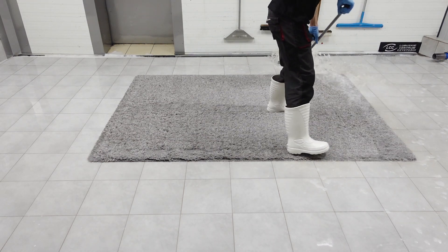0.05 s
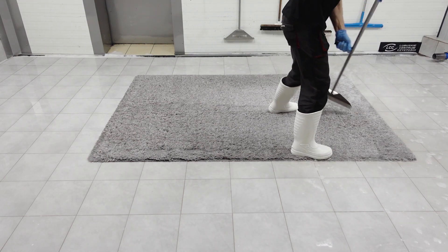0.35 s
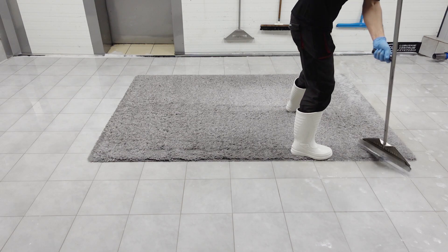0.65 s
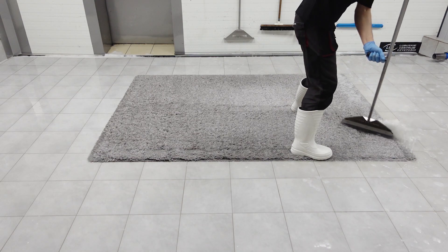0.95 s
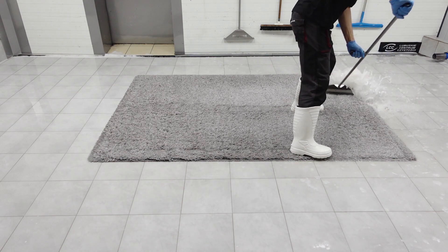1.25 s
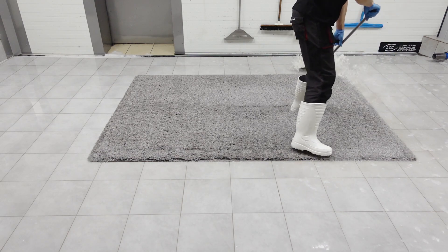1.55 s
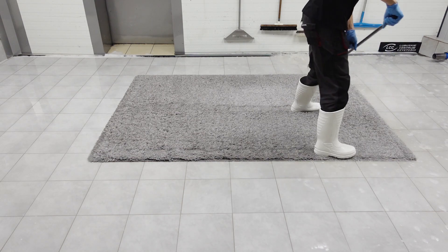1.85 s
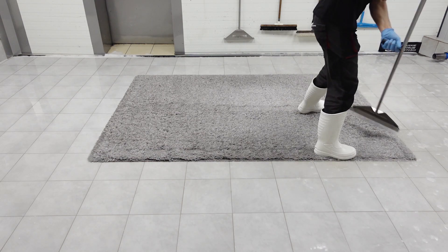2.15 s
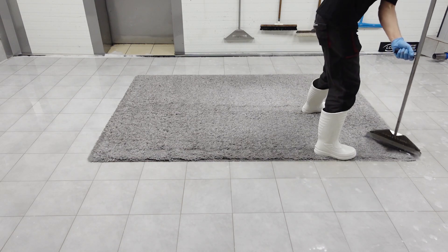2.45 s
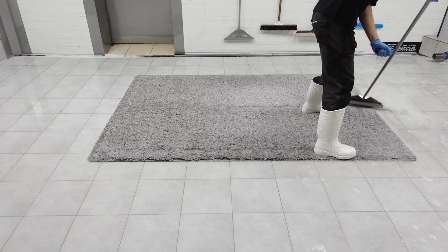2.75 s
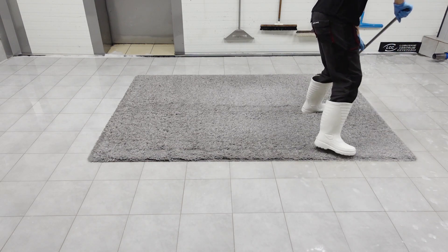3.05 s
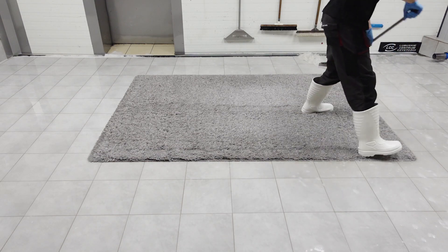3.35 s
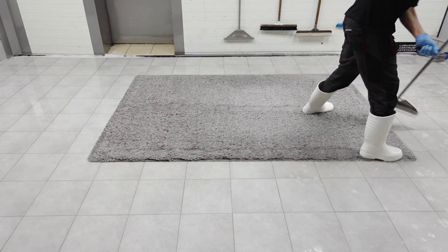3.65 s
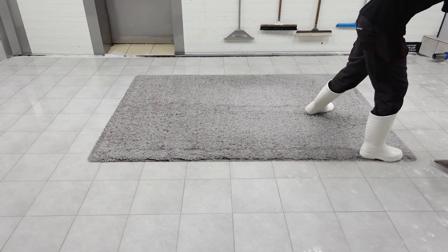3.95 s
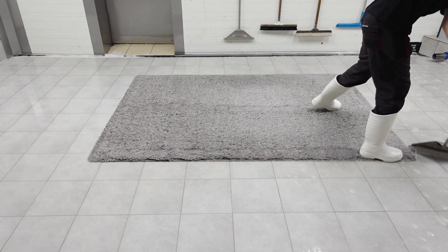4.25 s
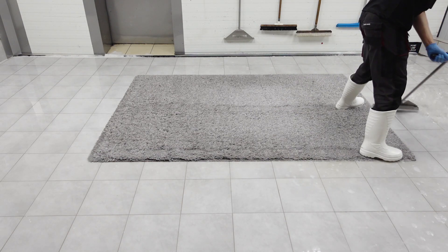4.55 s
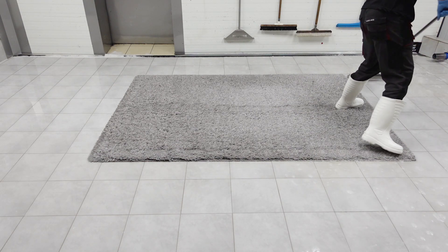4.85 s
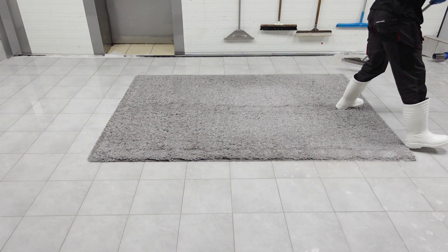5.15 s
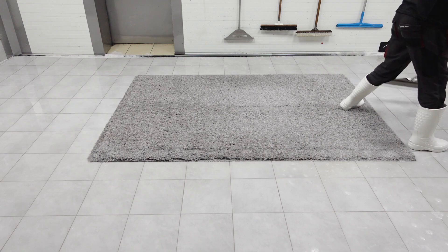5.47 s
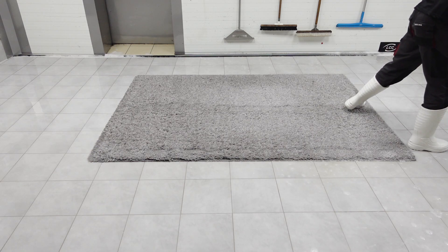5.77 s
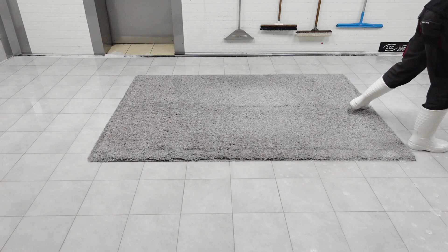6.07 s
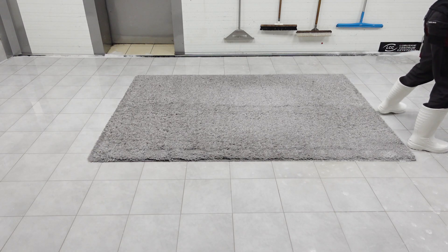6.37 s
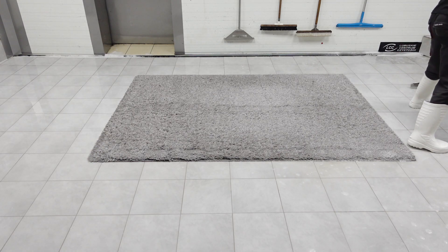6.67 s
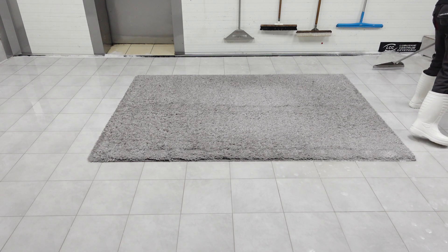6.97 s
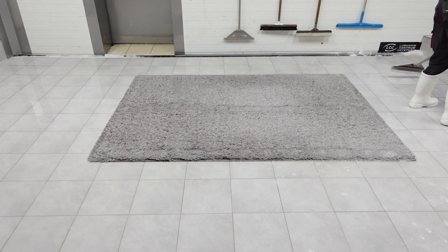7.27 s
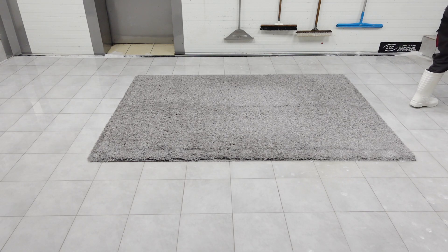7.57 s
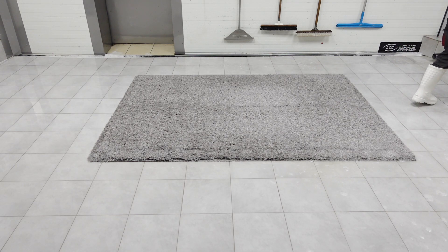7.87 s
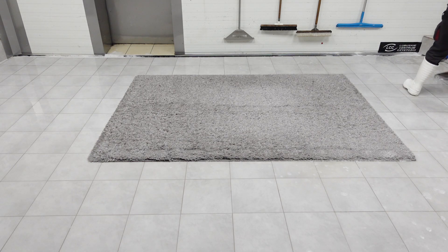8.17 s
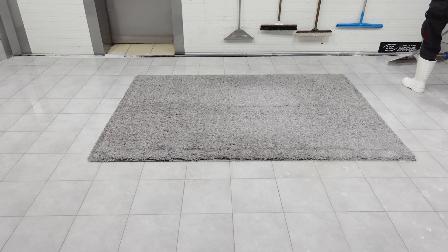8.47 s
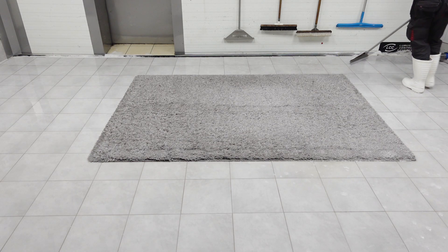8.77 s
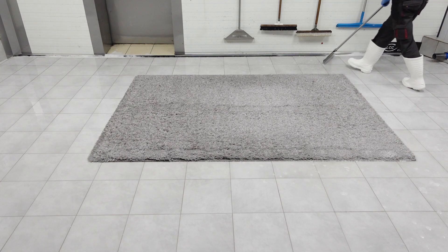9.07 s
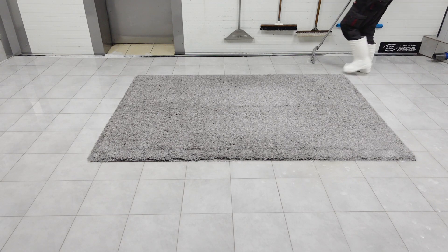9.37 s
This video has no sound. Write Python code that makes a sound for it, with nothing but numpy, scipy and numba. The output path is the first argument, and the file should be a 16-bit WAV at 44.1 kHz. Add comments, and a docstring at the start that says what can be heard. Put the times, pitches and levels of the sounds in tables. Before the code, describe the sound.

Water gushes and sprays onto tiles as a squeegee sweeps a wet carpet again and again, its frame knocking once.

```python
"""A bubbling gush and a hiss of spray: a floor squeegee, a few metres away, pushes water off a soaked
carpet onto the tiles of a hard-walled washing room. Each stroke drives a wave of ringing bubbles and
throws drops; in the later pushes a hollow under the wave rings with a gliding pitch. The wet pile
squelches under blade and rubber boots, and a low groan swells twice. The blade slaps down between
strokes, and its frame knocks once and rebounds. A faint ventilation hum lies under it all."""
import sys
import numpy as np
from scipy import signal
from scipy.fft import rfft, irfft
from scipy.io import wavfile
from numba import njit

SR = 44100
rng = np.random.default_rng(int(sys.argv[2]) if len(sys.argv) > 2 else 0)


def transcribe(u):
    """Save the signal u as a 16-bit wav file named by the first command-line argument.

    u: samples, shape (n,) or (channels, n), limited to [-1, 1]; the rate is SR.
    q: integer samples, one column per channel.
    """
    v = np.clip(np.atleast_2d(u).T, -1, 1)
    q = np.round(v * 32767).astype(np.int16)
    wavfile.write(sys.argv[1], SR, q)


N = 415412
TIME = np.arange(N) / SR
LIFT_DB_PER_S = 74  # release of spray and hollow once the blade lifts

# Pushes of the blade: start t/s, attack/s, lift t/s, spray end t/s, wave release/(dB/s), wave level/dB,
# spray level/dB, swell/(dB/s), deepest t/s, gulp level there against the wave/dB
STROKES = [(-0.25, .25, 0.27, 0.24, 82, -30.5, -32, 7, 0.16, -15.5),
           (0.75, 0.57, 1.8, 1.83, 74, -37, -34, 13.5, 1.83, -8),
           (2.48, 0.36, 3.47, 3.23, 78, -41.5, -38.5, -6.5, 2.95, -5.5),
           (4.13, 0.55, 5.02, 4.94, 190, -23, -28.5, 1, 4.3, -15.5),
           (6.019, 0.34, 6.98, 6.82, 78, -23, -33.5, 5.5, 6.6, -13.5),
           (6.84, 0.094, 6.994, 7.02, 70, -26, -33.5, 3, 6.9, -20),
           (7.88, 0.27, 8.9, 8.55, 80, -30, -35.5, -5.5, 8.38, -10.5),
           (8.56, 0.24, 9.27, 9.5, 78, -30.5, -44.5, -3.5, 9.15, -10)]
def strokes(deep_s=0.13, thin_gulp_db=-2):
    """Each push piles water deep, then thins. Returns wave power, spray power and the gulps' dB offset."""
    wave_power, spray_power, gulping = 0, 0, 0
    for start, attack_s, lift, spray_end, release, wave_db, spray_db, swell, deepest, gulp_db in STROKES:
        full = start + attack_s
        effort = undb(swell * (np.clip(TIME, full, lift) - (full + lift) / 2))
        wave_shape = envelope(start, attack_s, lift, release, curve=1.08)
        spray_shape = envelope(start, attack_s, spray_end, LIFT_DB_PER_S, curve=1.19)
        push = (effort * undb(wave_db) * wave_shape) ** 2 + 1e-18
        depth = bell_curve(deepest, deep_s)
        gulping += push * (gulp_db + thin_gulp_db * (1 - depth))
        wave_power += push
        spray_power += (effort * undb(spray_db) * spray_shape) ** 2
    return wave_power, spray_power, gulping / wave_power


# Water flung off the blade: t/s, attack/s, release after/s, wash level/dB, spray level/dB
FLINGS = [(0.17, .025, 0.081, -38.5, -32.5), (0.41, 0.027, 0.08, -42.5, -44.5),
          (0.893, .03, 0.046, -49, -48.5), (1.28, .03, 0.07, -36, -38), (1.67, 0.071, 0.2, -33.5, -39.5),
          (1.965, 0.024, 0.074, -39, -37.5), (3.287, .09, 0.12, -41.5, -34.5),
          (3.462, 0.044, 0.08, -40, -39.5), (4.222, 0.057, 0.13, -30, -44), (5.186, .006, 0.18, -42, -38),
          (7.072, 0.032, 0.054, -34, -28), (7.947, 0.082, 0.1, -30, -38.5), (8.42, 0.028, 0.044, -42, -39)]
def flings(wash_db_per_s=48, spray_db_per_s=74.5):
    """Flung water rains on the tiles; its spray dies sooner than its wash. Returns the power of both."""
    wash_power, spray_power = 0, 0
    for start, attack_s, length_s, wash_db, spray_db in FLINGS:
        end = start + length_s
        wash_power += (undb(wash_db) * envelope(start, attack_s, end, wash_db_per_s)) ** 2
        spray_power += (undb(spray_db) * envelope(start, attack_s, end, spray_db_per_s)) ** 2
    return wash_power, spray_power


# Mid-forward EQ of the wave: f/Hz, level/dB
WAVE_EQ = [(100, -63), (400, -30.5), (700, -3.5), (1000, -1), (1500, 2), (2300, 0.5), (3200, -4),
           (4900, -12), (7000, -13.5), (10000, -19), (15000, -47.5)]
def wave():
    """The churning ridge of water ahead of the blade: ringing bubbles in froth."""
    cloud = bubbles(low_hz=616, high_hz=5956, cycles=12.1, spread_db=1.4, glide=0.22, count=50000)
    froth = undb(2.5) * droplets(spread_db=2.5, count=90000)
    ridge = unit(churn(equalise(cloud + froth, WAVE_EQ)))
    return ridge * undb(1.1 * wander(22))


def churn(rest, flicker_db=1.97, per_s=17):
    """Bubbles of each size come and go in their own bursts, so each half octave flickers alone."""
    out = np.zeros(N)
    for hz in 700 * 2 ** (np.arange(6) / 2):
        band = signal.sosfiltfilt(signal.butter(4, hz, fs=SR, output="sos"), rest)
        out += band * undb(flicker_db * wander(per_s))
        rest = rest - band
    return out + rest


# Throaty EQ of the gulps: f/Hz, level/dB
GULP_EQ = [(70, -47), (220, -36), (350, -11), (480, -1), (700, 6), (950, -4), (1400, 2), (2500, -43)]
def gulps():
    """Large bubbles fold in where the water piles deep."""
    cloud = bubbles(low_hz=291, high_hz=1285, cycles=12, spread_db=1.5, glide=0.11, count=7000)
    return unit(equalise(cloud, GULP_EQ) * undb(5.9 * wander(16)))


# Resonant sweeps of the long pushes: bandwidth/pitch, breakpoints of (t/s, f/Hz, level/dB)
HOLLOWS = [(0.87, [(4.2, 900, -45), (4.3, 1640, -27), (4.48, 1650, -43), (4.7, 1390, -23.5),
           (4.82, 1590, -27), (5.0, 1730, -24.5), (5.07, 1480, -21), (5.13, 1110, -33.5)]),
           (0.69, [(6.05, 1090, -48), (6.19, 1260, -30), (6.25, 1170, -42), (6.42, 990, -26),
           (6.58, 1030, -33), (6.76, 1380, -29), (6.84, 1500, -35), (6.93, 1494, -26), (7.1, 1300, -35.5)]),
           (0.43, [(8.3, 800, -50), (8.42, 840, -36), (8.52, 940, -29), (8.62, 1200, -32),
           (8.76, 1620, -29), (8.9, 1950, -39)]), (0.68, [(8.86, 1160, -42), (9.0, 1160, -29.5),
           (9.1, 1250, -26), (9.22, 1580, -29), (9.32, 1710, -31.5), (9.41, 1750, -44)])]
def hollows(slosh_octaves=0.045, attack_s=0.012):
    """Froth rings the hollow under the bow wave; its pitch climbs as the water runs thin."""
    froth, out = droplets(spread_db=1.2, count=30000), np.zeros(N)
    for width, sweep in HOLLOWS:
        times, hz, db = np.transpose(sweep)
        pitch = np.interp(TIME, times, hz) * 2 ** (slosh_octaves * wander(12))
        voice = unit(resonance(froth, pitch, width, width) / np.sqrt(pitch))
        gate = envelope(times[0], attack_s, times[-1], LIFT_DB_PER_S)
        out += voice * undb(np.interp(TIME, times, db)) * gate
    return out


# Low gushing accents: t/s, centre f/Hz, level/dB
SURGES = [(4.52, 513, -34.5), (4.645, 487, -36), (4.77, 528, -30), (6.68, 726, -33), (6.995, 475, -37),
          (8.11, 695, -31), (8.27, 382, -39), (8.361, 477, -35), (8.63, 657, -36.5)]
def surges(width=0.46, attack_s=0.012, length_s=0.016, release_db_per_s=163):
    """A lump of water folds over ahead of the blade with a sudden low gush."""
    shower, out = droplets(spread_db=1, count=20000), np.zeros(N)
    for start, hz, db in SURGES:
        gush = unit(resonance(shower, hz, width, width))
        out += undb(db) * gush * envelope(start, attack_s, start + length_s, release_db_per_s)
    return out


# Crests breaking out of the wave: peak t/s, centre f/Hz, level/dB
CRESTS = [(0.215, 1010, -31), (1.359, 2570, -35), (1.83, 836, -30.5), (1.86, 1803, -30), (3.26, 2900, -41),
          (3.47, 1480, -34.5), (4.96, 4570, -27), (8.14, 1620, -29), (8.39, 1080, -29)]
def crests(spread_s=0.043, width=0.47):
    """A crest swells and collapses into a brief shower of bubbles of much the same size."""
    shower, out = droplets(spread_db=5, count=25000), np.zeros(N)
    for peak, hz, db in CRESTS:
        fizz = unit(resonance(shower, hz, width, 2 * width))
        out += undb(db) * fizz * bell_curve(peak, spread_s)
    return out


# Bright EQ of the spray: f/Hz, level/dB
SPRAY_EQ = [(800, -32.5), (1600, 0.5), (2600, 4), (5000, 0.5), (6500, -1), (8500, -3), (13500, -9),
            (16000, -10.5)]
def spray(wave_db, spray_db, crossover_hz=7500, fineness=0.21):
    """Spurts of mist and crackling drops; deep water throws coarser, duller drops than the bare pile."""
    mist = droplets(spread_db=2.5, count=150000)
    crackle = undb(-8.5) * droplets(spread_db=0.5, count=6000) + undb(-11) * spatter()
    drops = unit(equalise(mist + crackle, SPRAY_EQ)) * undb(1.3 * wander(30))
    coarse = signal.sosfiltfilt(signal.butter(2, crossover_hz, fs=SR, output="sos"), drops)
    fine = undb(fineness * (spray_db - wave_db)) * (drops - coarse)
    return undb(spray_db) * (coarse + fine)


def spatter(decay_s=0.00094):
    """Single fat drops burst on the tiles, each a tiny splash of noise."""
    hits = np.abs(droplets(spread_db=2, count=900))
    bursts = signal.oaconvolve(hits, np.exp(-TIME[:SR // 100] / decay_s))[:N]
    return unit(bursts * rng.standard_normal(N))


# Blade and boots meeting the wet floor: t/s, splash level/dB, knock level/dB, splash low-pass f/Hz
SLAPS = [(0.794, -29.5, -64, 3880), (2.449, -32.5, -57, 5030), (4.1125, -18.5, -51, 12020),
         (6.035, -35, -59, 14000), (7.5665, -34.5, -68, 12000), (7.7882, -37, -74, 6040)]
# Broad EQ of those hits: f/Hz, level/dB
SLAP_EQ = [(40, -38), (150, -14.5), (500, -2), (1400, -3), (2400, -3), (4000, -7.5), (8000, -11),
           (15000, -24)]
def slaps(decay_s=0.04, knock_trim_db=-3, splash_trim_db=-7):
    """The rubber lands, rings the frame of the blade and bursts the water film."""
    t, out = TIME[:SR // 3], np.zeros(N)
    landing = 1 - np.exp(-t / 0.0013)  # water cushions the first touch
    for start, splash_db, knock_db, top_hz in SLAPS:
        burst = undb(splash_db + splash_trim_db) * rng.standard_normal(len(t)) * np.exp(-t / decay_s)
        splash = signal.sosfilt(signal.butter(2, top_hz, fs=SR, output="sos"), burst)
        body = undb(knock_db + knock_trim_db) * frame_ring(t)
        add(out, start, landing * (body + splash))
    return equalise(out, SLAP_EQ)


# The frame's knock and its rebound: t/s, crack level/dB, ring level/dB
KNOCKS = [(6.841, -13, -20), (6.871, -22, -32)]
# EQ of the contact transient: f/Hz, level/dB
CRACK_EQ = [(250, -11), (400, -1), (1400, 2.5), (2400, -1.5), (3200, -10), (5500, -14), (9000, -15.5),
            (15000, -25)]
def knocks(contact_s=0.012, decay_s=0.01, low_cut_hz=240):
    """The frame hits something hard, chatters briefly and rings; it is too light to give deep bass."""
    t, out = TIME[:SR // 3], np.zeros(N)
    contact = np.exp(-np.maximum(t - contact_s, 0) / decay_s)
    for start, crack_db, ring_db in KNOCKS:
        chatter = np.sign(rng.standard_normal(len(t))) * contact
        add(out, start, undb(crack_db) * equalise(chatter, CRACK_EQ) + undb(ring_db) * frame_ring(t))
    return signal.sosfilt(signal.butter(4, low_cut_hz, "highpass", fs=SR, output="sos"), out)


# Modes of the blade and its frame: f/Hz, t60/s, level/dB
FRAME_MODES = [(392, 0.14, -18), (471.5, 0.14, 3), (539, 0.1, 2.5), (750, 0.039, -7), (964, 0.092, -8),
               (1276, .08, -2), (1574, 0.25, -4.5), (2330, 0.17, -2)]
def frame_ring(t):
    """The struck blade and frame ring up within a few cycles and die away; rms 1 over the first 20 ms."""
    tone = sum(undb(db) * np.sin(2 * np.pi * (hz * t + rng.random())) * undb(-60 * t / t60)
               for hz, t60, db in FRAME_MODES)
    tone *= 1 - np.exp(-t / 0.0029)
    return tone / np.std(tone[:SR // 50])


# Solo glugs in the carpet: t/s, f/Hz, level/dB
POCKETS = [(0.038, 320, -29), (0.448, 279, -37), (1.499, 258, -33.5), (1.794, 400, -27),
           (7.131, 165.3, -31), (7.278, 266, -33), (7.596, 295, -34), (8.36, 400.7, -28), (8.731, 240, -35)]
def pockets(cycles=24.0, glide=0.13):
    """Single air pockets collapse, each shedding a fainter, smaller bubble just after."""
    starts, hz, db = np.transpose(POCKETS)
    lag, shrink = rng.random((len(starts), 2)).T
    life = np.full(len(starts), cycles)
    glugs = ring_bubbles(starts, hz, life, undb(db), glide)
    shed = ring_bubbles(starts + 0.0324 * lag, hz * (1 + 0.18 * shrink), life, undb(db) / 2, glide)
    return glugs + shed


# Boots and blade bearing down: start t/s, release t/s, level/dB
PRESSES = [(0.116, 0.525, -44), (0.995, 1.554, -48), (1.869, 2.128, -43), (2.665, 3.08, -50),
           (3.34, 3.606, -49), (5.2, 5.48, -46.5), (7.07, 7.26, -44.5), (8.216, 8.462, -53),
           (8.573, 8.982, -45.5)]
# Muffled EQ of the wet pile: f/Hz, level/dB
SQUELCH_EQ = [(55, -22), (80, -15.5), (105, -7.5), (170, 0.5), (300, 3), (400, 1.5), (600, 0), (1200, -45)]
def squelch(attack_s=0.037, release_db_per_s=62):
    """Weight comes on, stays and eases off, squeezing air pockets through the wet pile."""
    power = sum((undb(db) * envelope(start, attack_s, end, release_db_per_s)) ** 2
                for start, end, db in PRESSES)
    cloud = bubbles(low_hz=80.2, high_hz=654, cycles=14.3, spread_db=2.5, glide=0.091, count=3500)
    return np.sqrt(power) * unit(equalise(cloud, SQUELCH_EQ))


# Low groaning resonances: f/Hz, level/dB
GROAN_MODES = [(224, -8), (293, -2), (345, 0)]
# Swells of the groan: start t/s, attack/s, release t/s, level/dB
GROAN_SWELLS = [(0.36, 0.092, 0.56, -51.5), (1.92, .2, 2.3, -47)]
def groan(width=0.029, release_db_per_s=174):
    """A few narrow low tones swell twice as the blade drags."""
    ticks = droplets(spread_db=2, count=6000)
    voice = sum(undb(db) * unit(resonance(ticks, hz, width, 2 * width)) for hz, db in GROAN_MODES)
    swell = sum(undb(db) * envelope(start, attack_s, end, release_db_per_s)
                for start, attack_s, end, db in GROAN_SWELLS)
    return voice * swell


# EQ of the air bed: f/Hz, level/dB
AIR_EQ = [(25, -37), (60, -25), (125, -9.5), (170, -3.5), (290, 2.5), (440, -2), (530, -8.5), (700, -3),
          (950, -15.5), (3000, -29), (5500, -14), (16000, -17.5)]
# Fan tones: f/Hz, rms level/dB
FAN_TONES = [(292, -66.5), (436, -61.5), (689, -66.5)]
def ventilation(air_db=-52):
    """Steady air noise with a few fan tones that waver in level and pitch."""
    out = unit(equalise(rng.standard_normal(N), AIR_EQ)) * undb(air_db)
    for hz, db in FAN_TONES:
        amplitude = np.sqrt(2) * undb(db + 2 * wander(5.5))
        pitch = hz + 4 * wander(13)
        out += amplitude * np.sin(2 * np.pi * np.cumsum(pitch) / SR)
    return out


# Reverb time of the tiled room: f/Hz, t60/s
ROOM_DECAY = [(150, 0.88), (600, 0.6), (2000, 0.52), (6000, 0.62)]
def reverb_tails(predelay_s=0.0041, size=SR // 2):
    """Two unrelated diffuse echoes off tiles and walls, each band dying at its own rate; energy 1 each."""
    hz, t, spectrogram = signal.stft(rng.standard_normal((2, size)), SR, nperseg=256)
    fade = undb(-60 * t / lookup(ROOM_DECAY, hz)[:, None])
    tails = signal.istft(spectrogram * fade)[1][:, :size] * (TIME[:size] > predelay_s)
    return tails / np.linalg.norm(tails, axis=1, keepdims=True)


# EQ of the reverb's side channel: f/Hz, level/dB
SIDE_EQ = [(90, 1.5), (250, -4.5), (600, -2.5), (12000, -0.5)]
def room(x, direct_db=-0.64, echo_db=-7.5, side_db=-11, moves=60):
    """The blade keeps moving, so the sound crossfades through echo patterns; a side echo gives width."""
    mid, side = undb(direct_db) * x, np.zeros(N)
    position = np.linspace(0, moves, N)
    for spot in range(moves + 1):
        near = np.flatnonzero(np.abs(position - spot) < 1)
        stretch = x[near] * np.cos(np.pi / 2 * (position[near] - spot))
        centred, sideways = signal.fftconvolve(stretch[None], reverb_tails(), axes=1)
        add(mid, TIME[near[0]], undb(echo_db) * centred)
        add(side, TIME[near[0]], undb(side_db) * sideways)
    side = equalise(side, SIDE_EQ)
    return np.array([mid + side, mid - side])


def bubbles(low_hz, high_hz, cycles, spread_db, glide, count):
    """A cloud of bubbles, even in power per Hz; most are faint and a few are loud."""
    when, pitch, life, luck = rng.random((count, 4)).T
    hz = low_hz + (high_hz - low_hz) * pitch
    amplitude = np.sqrt(hz) * undb(-spread_db * np.log(np.maximum(luck, 1 / 150)))
    return unit(ring_bubbles(when * N / SR, hz, cycles * (.5 + life), amplitude, glide))


@njit
def ring_bubbles(starts, hz, cycles, amplitude, glide):
    """Each bubble swells for two cycles and rings down 50 dB, rising in pitch as it nears the surface."""
    out = np.zeros(N)
    for k in range(len(starts)):
        start, length = int(starts[k] * SR), int(cycles[k] * SR / hz[k]) + 2
        turn = 2 * np.pi * hz[k] / SR
        phasor = amplitude[k] + 0j
        step = np.exp(1j * turn - 5.76 / length)
        rise = np.exp(1j * turn * glide / length)
        for i in range(max(start, 0), min(start + length, N)):
            phasor *= step
            step *= rise
            out[i] += phasor.imag * min((i - start) * hz[k] / SR / 2, 1.)
    return out


def droplets(spread_db, count):
    """Sharp ticks of bursting films and landing drops, scattered at random."""
    when, luck, sign = rng.random((count, 3)).T
    amplitude = np.sign(sign - .5) * undb(-spread_db * np.log(np.maximum(luck, 1 / 120)))
    return unit(np.bincount((when * N).astype(int), amplitude, N))


def resonance(x, hz, first_width, second_width):
    """Two band-passes in series on one fixed or moving pitch."""
    pitch = hz * np.ones(N)
    return bandpass(bandpass(x, pitch, first_width), pitch, second_width)


@njit
def bandpass(x, hz, width):
    """State-variable band-pass with a moving centre, gain 1 there; width is a share of the centre."""
    out, band_state, low_state = np.empty(N), 0., 0.
    for i in range(N):
        tuning = np.tan(np.pi * hz[i] / SR)
        band = (band_state + tuning * (x[i] - low_state)) / (1 + tuning * (tuning + width))
        band_state = 2 * band - band_state
        low_state += 2 * tuning * band
        out[i] = width * band
    return out


def equalise(x, points, size=2048):
    """Minimum-phase EQ shaped by (f/Hz, level/dB) points; white noise keeps its power."""
    gain = undb(lookup(points, np.fft.rfftfreq(size, 1 / SR)))
    cepstrum = irfft(np.log(gain))
    cepstrum[1:size // 2] *= 2
    cepstrum[size // 2 + 1:] = 0
    response = irfft(np.exp(rfft(cepstrum)))
    return signal.oaconvolve(x, response / np.linalg.norm(response))[:len(x)]


def envelope(start, attack_s, end, release_db_per_s, curve=1):
    """Gain that builds over the attack, holds until the end, then dies away."""
    attack = np.clip((TIME - start) / attack_s, 0, 1) ** curve
    return attack * undb(-release_db_per_s * np.maximum(TIME - end, 0))


def bell_curve(peak, spread_s):
    """Gaussian swell that reaches 1 at the peak time."""
    return np.exp(-.5 * ((TIME - peak) / spread_s) ** 2)


def wander(per_s):
    """Random modulator that ramps to per_s new values a second; spread near 1."""
    knots = rng.standard_normal(int(TIME[-1] * per_s) + 2)
    return np.interp(TIME * per_s, np.arange(len(knots)), knots)


def lookup(points, hz):
    """Read (f/Hz, value) points on a log-frequency axis."""
    point_hz, value = np.transpose(points)
    return np.interp(np.log(np.maximum(hz, 1)), np.log(point_hz), value)


def add(out, start_s, x):
    """Mix x into out from start_s on."""
    start = max(int(start_s * SR), 0)
    out[start:start + len(x)] += x[:max(N - start, 0)]


def undb(db):
    """Decibels to gain."""
    return 10 ** (np.asarray(db) / 20)


def unit(x):
    """Scale to rms 1."""
    return x / np.sqrt(np.mean(x ** 2))


def scene(trickle_db=-79):
    """Strokes and flings ride the levels of wave, gulps and spray; all layers share the one room."""
    pushed_wave, pushed_spray, gulp_db = strokes()
    flung_wash, flung_spray = flings()
    trickle = undb(trickle_db) ** 2
    wave_db = 10 * np.log10(pushed_wave + flung_wash + trickle)
    spray_db = 10 * np.log10(pushed_spray + flung_spray + trickle)
    water = undb(wave_db) * (undb(0.5) * wave() + undb(gulp_db) * gulps())
    drops = undb(3) * spray(wave_db, spray_db)
    blade = water + hollows() + surges() + crests() + drops + slaps() + knocks()
    lows = squelch() + pockets() + groan()
    return room(blade + lows + ventilation())


def record(dry, lean_db=0.5, top_hz=15850):
    """The microphone pair leans slightly right and cuts the top steeply."""
    pair = dry * undb(np.array([[-lean_db], [lean_db]]) / 2)
    return signal.sosfilt(signal.ellip(10, .2, 80, top_hz, fs=SR, output="sos"), pair)


dry = scene()
out = record(dry)
transcribe(out)
```